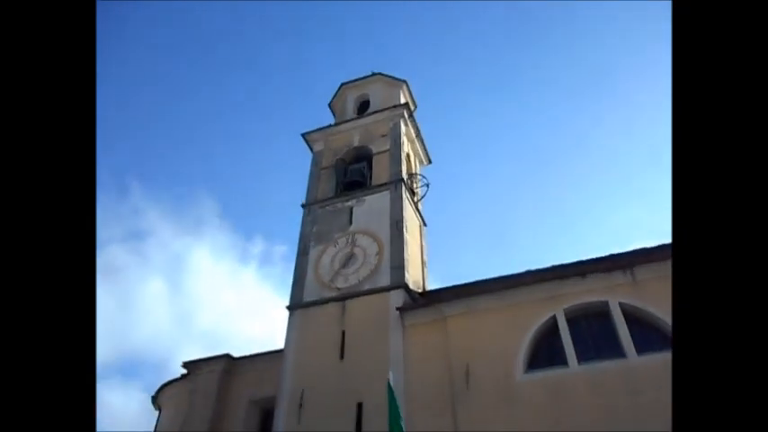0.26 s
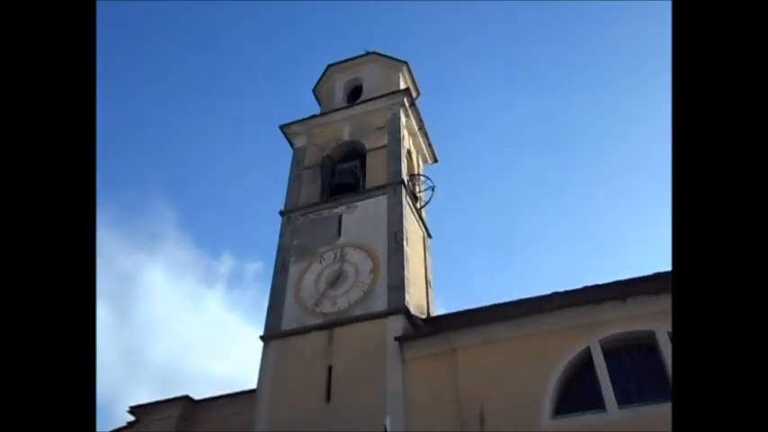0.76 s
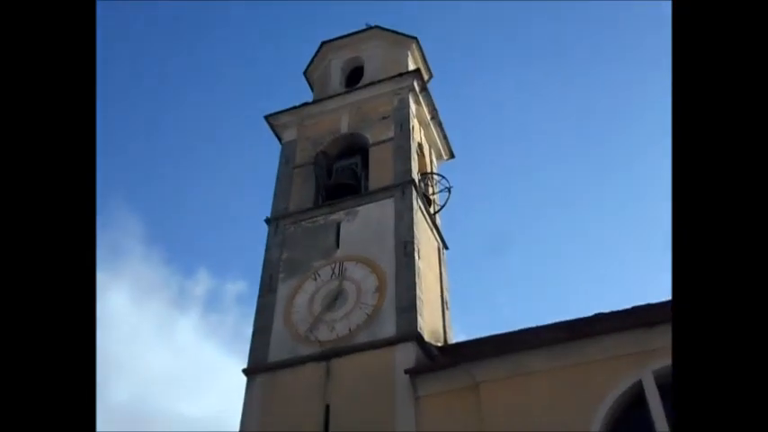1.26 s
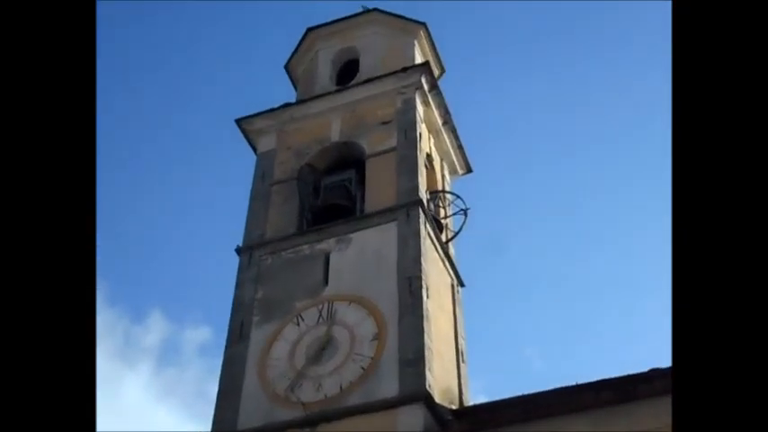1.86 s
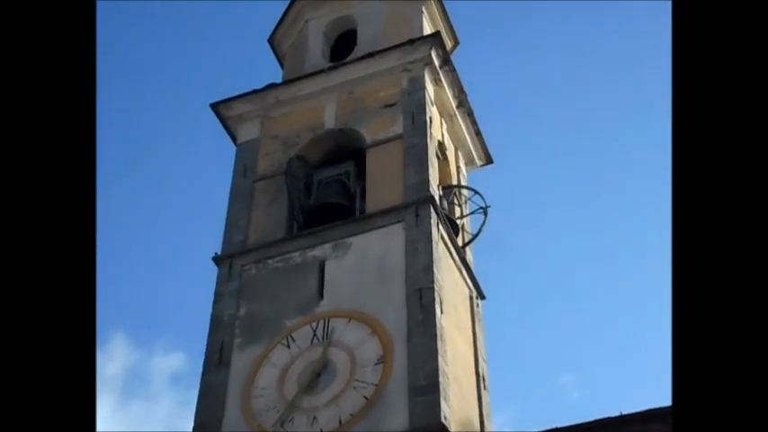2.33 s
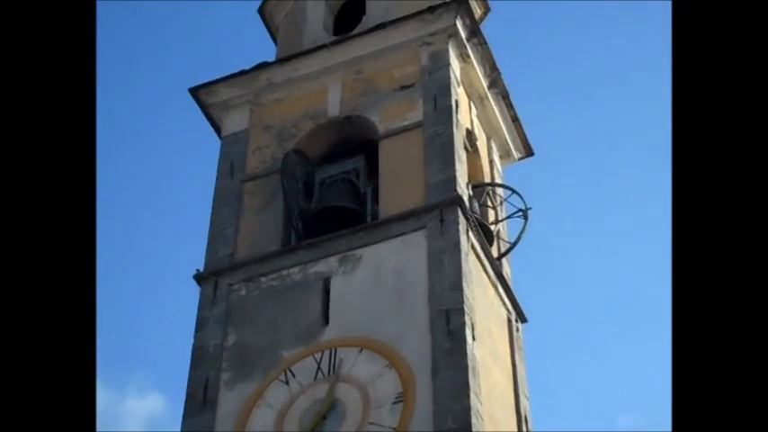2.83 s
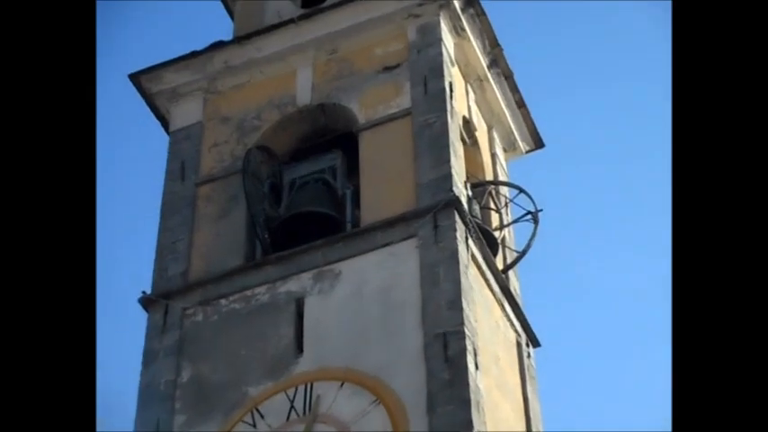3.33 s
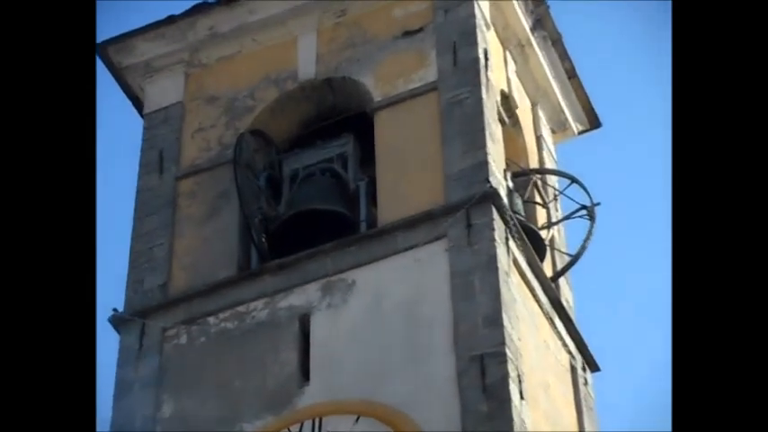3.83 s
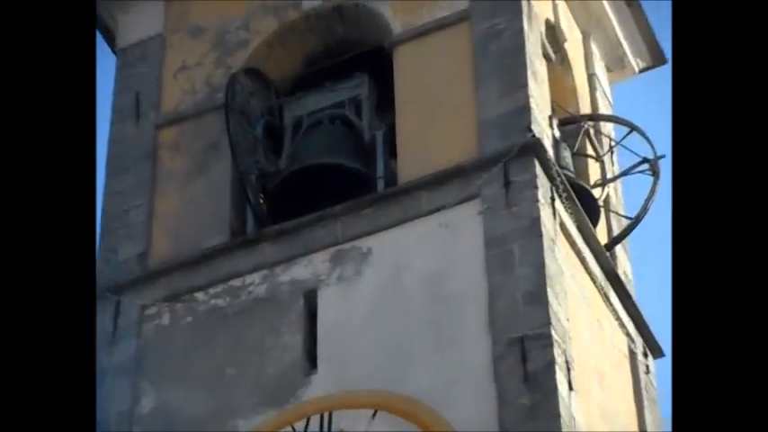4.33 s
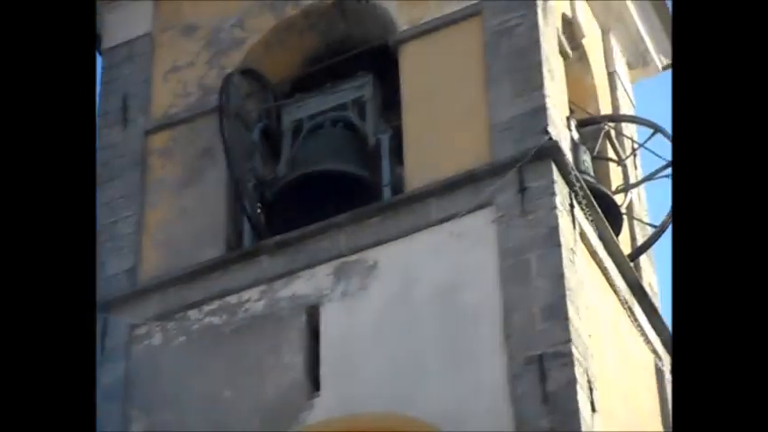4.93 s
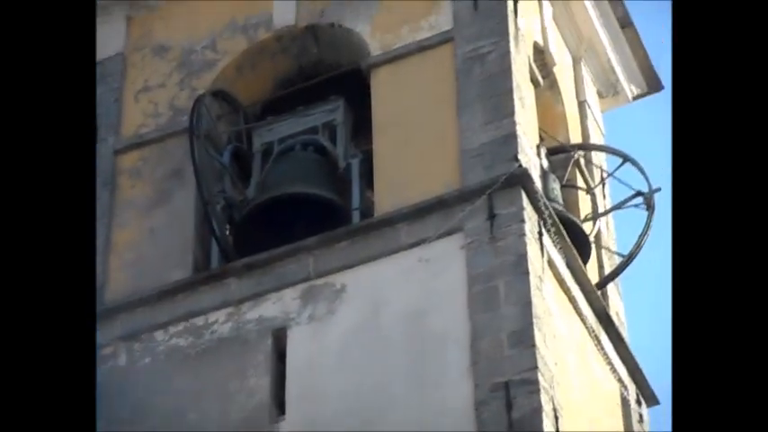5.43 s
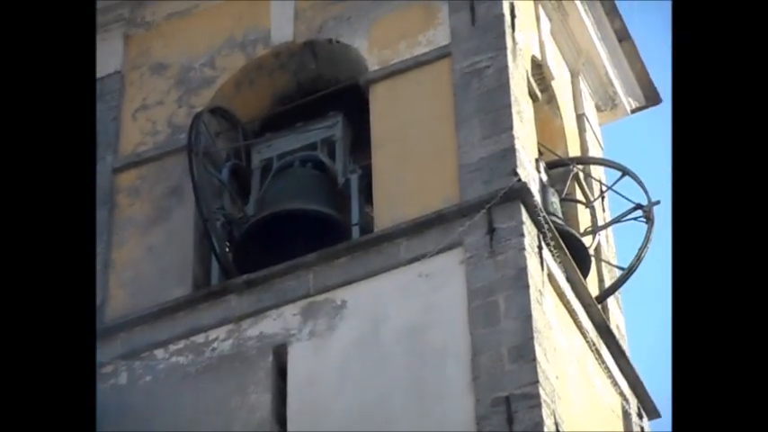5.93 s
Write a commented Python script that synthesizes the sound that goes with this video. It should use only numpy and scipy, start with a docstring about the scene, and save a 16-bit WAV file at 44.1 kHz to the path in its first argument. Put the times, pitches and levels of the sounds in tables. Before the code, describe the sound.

Against the soft air of a quiet town square, a camera's built-in microphone picks up its own zoom: a thin, buzzing gear whir dotted with irregular little ticks from the lens. The whir cuts off, and a single loud snap of the lever follows. Small plastic clicks and brief finger rubs close the scene, all very near and without echo.

```python
"""A small camera's zoom motor rasps in fast steps, heard by the camera's own microphone.
Its gear teeth knock, scrape and clack back through the drive train, while the sliding lens barrel
catches and ticks. The motor stops and the sprung zoom lever snaps home. Fingers click and rub on
the plastic case, and under it all lies the soft outdoor hush of a quiet square."""
import sys
import numpy as np
from scipy import signal
from scipy.fft import rfft, irfft
from scipy.io import wavfile
from scipy.ndimage import uniform_filter1d, minimum_filter1d

SR = 44100
rng = np.random.default_rng(int(sys.argv[2]) if len(sys.argv) > 2 else 0)


def digitize_waveform(pressure):
    """Quantize a signal to 16-bit integers and store it at the path in sys.argv[1].

    Rows of a 2-D input are taken as channels; values are limited to [-1, 1].
    """
    field = np.atleast_2d(pressure).T
    bounded = np.clip(field, -1, 1)
    quanta = np.round(bounded * 32767).astype(np.int16)
    wavfile.write(sys.argv[1], SR, quanta)


N = 272538
TIME = np.arange(N) / SR
RING_SIZE = 2048  # samples in a body's impulse response
FREQS = np.arange(RING_SIZE // 2 + 1) * SR / RING_SIZE


def undb(db):
    """Decibels to gain."""
    return 10 ** (np.asarray(db) / 20)


def unit(x):
    """Scale to rms 1."""
    return x / np.sqrt(np.mean(x ** 2))


def drift(rate_hz):
    """A smooth random wobble with rms 1."""
    hold = int(SR / rate_hz)
    held = np.repeat(rng.standard_normal(N // hold + 4), hold)
    return unit(uniform_filter1d(uniform_filter1d(held, hold), hold)[hold:hold + N])


def bell(centre_hz, width_hz, slope=2):
    """A bump over frequency, 1 at its centre; centred on 0 Hz it is a low shelf."""
    return 1 / (1 + ((FREQS - centre_hz) / width_hz) ** slope)


def delay(ms):
    """Response over frequency of a short delay."""
    return np.exp(-2j * np.pi * FREQS * ms / 1000)


def resonances(modes):
    """Gain over frequency of a body with (Hz, width, dB) modes; it rolls off below the lowest."""
    power = sum(undb(db) ** 2 / (1 + 2 * ((FREQS - hz) / width) ** 2) ** 2 for hz, width, db in modes)
    return np.sqrt(power) * FREQS ** 2 / (FREQS ** 2 + (modes[0][0] / 2) ** 2)


def ring(gain):
    """The minimum-phase impulse response that has this gain over frequency."""
    cepstrum = irfft(np.log(gain + gain.max() * 1e-4))
    cepstrum[1:RING_SIZE // 2] *= 2
    cepstrum[RING_SIZE // 2 + 1:] = 0
    return irfft(np.exp(rfft(cepstrum)))


def through(x, gain):
    """Sound x after passing through a body."""
    return signal.oaconvolve(x, ring(gain))[:len(x)]


def scuff(contact_ms):
    """A brief rough contact, centred in its buffer: random in detail, even in spectrum."""
    ms = (np.arange(RING_SIZE) - RING_SIZE // 2) * 1000 / SR
    pressure = np.exp(-(ms / contact_ms / 2) ** 4)
    force = rng.standard_normal(RING_SIZE) * pressure
    for _ in range(8):  # flatten the spectrum, keep the burst short
        force = pressure * irfft(np.exp(1j * np.angle(rfft(force))))
    return force


def strike(force, body, tail_db, tail_t60):
    """A contact rings a body, and the camera's many small parts add a diffuse tail."""
    hit = signal.fftconvolve(force, ring(body))
    tail = rng.standard_normal(RING_SIZE) * undb(-60 * TIME[:RING_SIZE] / tail_t60)
    tail *= undb(tail_db) / np.linalg.norm(tail)
    tail[0] = 1  # the direct hit
    return signal.fftconvolve(hit, tail)


def place(out, hit, s, db):
    """Land a hit's contact at time s; db is its energy as an rms over one millisecond."""
    start = int(s * SR) - RING_SIZE // 2
    hit = hit * undb(db) * np.sqrt(SR / 1000 / np.sum(hit ** 2))
    out[start:start + len(hit)] += hit[:N - start]


# The tone of the outdoor bed. Each row: frequency in Hz, relative noise density in dB.
HUSH_SPECTRUM = [(18, -57), (30, -24.5), (208, -15), (266, -10), (300, -10), (331, -11.5), (554, -7),
                 (744, -6), (821, -4), (1160, -4), (1280, -4.5), (1370, -8.5), (1710, -8), (5690, -16.5),
                 (10500, -32.5), (13600, -83), (22000, -120)]


def outdoor_hush(level_db=-56.5, swell_db=1.2, flicker_db=0.76):
    """A soft bed of distant town and air; its octaves swell together and flicker alone."""
    hz, db = np.transpose(HUSH_SPECTRUM)
    colour = undb(np.interp(np.log(FREQS + 1), np.log(hz), db))
    hush = 0
    for centre_hz in 62.5 * 2 ** np.arange(9):
        octave = np.cos(np.pi / 2 * np.clip(np.log2((FREQS + 1) / centre_hz), -1, 1))
        hush += through(rng.standard_normal(N), colour * octave) * undb(flicker_db * drift(7.6))
    return unit(hush) * undb(level_db + swell_db * drift(4.384))


# The plastic case's resonances. Each row: pitch in Hz, width in Hz, relative level in dB.
CASE_MODES = [(200, 160, -35), (440, 100, -12), (1012, 210, 4), (1620, 180, 0), (2064, 260, 2.5),
              (2660, 480, 4), (3450, 660, 1), (4230, 490, 2.5), (4970, 550, -3), (6240, 1700, -4),
              (7300, 1900, -10), (8940, 990, -11)]
# Finger strokes. Each row: firmest moment in seconds, level in dB, swell and release in seconds.
FINGER_STROKES = [(5.24, -57.5, 0.014, 0.028), (5.36, -55, 0.042, 0.093), (5.46, -54.5, 0.05, 0.041),
                  (5.69, -61.5, 0.011, 0.022), (6.035, -56, 0.04, 0.024), (6.17, -62, 0.049, .04)]


def finger_rubs(grain_db=2.5, low_cut_hz=1800):
    """Skin drags over the plastic in fine uneven grains; each stroke swells and lets go."""
    power = 0
    for s, db, swell_s, release_s in FINGER_STROKES:
        width_s = np.where(TIME < s, swell_s, release_s)
        power += undb(db) ** 2 * np.exp(-((TIME - s) / width_s) ** 2 / 2)
    drag = rng.standard_normal(N) * undb(grain_db * drift(400))
    body = resonances(CASE_MODES) * FREQS / (FREQS + low_cut_hz)
    return unit(through(drag, body)) * np.sqrt(power)


# Light clicks under the fingers. Each row: start in seconds, level in dB, bass and treble shelves
# in dB, pitch of the touched part in Hz.
FINGER_CLICKS = [(3.083, -28, 2, -34, 2640), (3.9118, -23, -20, 3, 5370), (4.171, -28, -3.5, -45, 2530),
                 (4.3463, -32.5, -26, 4.5, 3250), (4.736, -47, -15, 4, 4300), (4.888, -51, -20, 11, 8500),
                 (4.9565, -39.5, -30, 3, 4040), (4.984, -39, -14, -4.5, 1960), (5.0884, -29, 4, -5, 3600),
                 (5.099, -44, -22, 8, 7500), (5.145, -36.5, -16, 5, 5870), (5.156, -24.5, 10, 7, 7540),
                 (5.378, -43, 2, -5, 1500), (5.403, -34.5, -28, 12, 6900), (5.4667, -39, -15, 2, 2800),
                 (5.663, -40.5, 16, 3, 3240), (5.683, -35, 5.5, 11, 2010), (6.042, -30, 6, -0.5, 3900)]


def case_clicks(bass_hz=1700, treble_hz=4800, part_db=9.5):
    """Small clicks ring the case and the touched part; the spot sets how much bass and treble answer."""
    out = np.zeros(N)
    for s, db, bass_db, treble_db, part_hz in FINGER_CLICKS:
        touch_db = bass_db * bell(0, bass_hz, slope=6) + treble_db * (1 - bell(0, treble_hz, slope=6))
        touch_db += part_db * bell(part_hz, width_hz=300)
        body = resonances(CASE_MODES) * undb(touch_db)
        place(out, strike(scuff(contact_ms=0.56), body, tail_db=-12, tail_t60=0.035), s, db)
    return out


# The lever's one snap: start in seconds, level in dB, contact time in ms.
LEVER_SNAP = (4.8371, -6, 1)
# The lever and its seat. Each row: pitch in Hz, width in Hz, relative level in dB.
LEVER_MODES = [(150, 86, -33), (280, 100, -26.5), (790, 140, -9.5), (1105, 200, -1), (1586, 200, -2.5),
               (2000, 70, -8), (3030, 430, 2.5), (3600, 140, -4.5), (4400, 390, 0), (5540, 370, -5.5),
               (6800, 360, -9.5), (8240, 900, -19), (10000, 510, -20)]
# Faint, thin tones after the snap. Each row: pitch in Hz, starting level in dB, seconds to fade 60 dB.
AFTER_SNAP_TONES = [(884, -35, 0.078), (1415, -46, 0.17), (2320, -34, 0.085), (2510, -34.5, 0.1),
                    (3020, -39, 0.086), (4700, -44, 0.1), (7750, -39, 0.071)]


def zoom_lever():
    """The sprung lever snaps into its seat; faint, thin tones linger briefly after it."""
    out = np.zeros(N)
    s, db, contact_ms = LEVER_SNAP
    snap = strike(scuff(contact_ms), resonances(LEVER_MODES), tail_db=-17, tail_t60=0.021)
    place(out, snap, s, db)
    age, start = TIME[:SR // 4], int(s * SR)
    for hz, tone_db, t60 in AFTER_SNAP_TONES:
        out[start:start + len(age)] += undb(tone_db - 60 * age / t60) * np.sin(2 * np.pi * hz * age)
    return out


# The lens barrel's resonances. Each row: pitch in Hz, width in Hz, relative level in dB.
BARREL_MODES = [(123, 57, -15.5), (543, 170, -5), (742, 270, 0), (1066, 205, 1), (1430, 380, -4.5),
                (2050, 460, 2), (2680, 330, 5), (3160, 1500, 1)]
# The barrel's tone as it slides out. Each row: time in seconds, pitch of its hollow in Hz,
# wall ring in dB, chatter in dB.
BARREL_TRAVEL = [(.55, 1070, -5, -4.5), (.98, 1020, 1, -13), (1.13, 930, 0.5, -13), (1.31, 1090, 1.5, -15),
                 (1.5, 1030, -3.5, -13), (1.85, 1090, -3, -14), (2.65, 940, -8.5, -6), (3.7, 810, -6, -3)]


def barrel_knock(s, contact_hz, bass_db, hollow_db, detune=0.044, colour_db=0.9, bounce_ms=0.892):
    """One knock with a quick bounce and chatter, duller on soft contact; lens travel tunes its hollow."""
    travel_s, *columns = np.transpose(BARREL_TRAVEL)
    hollow_hz, wall_db, chatter_db = (np.interp(s, travel_s, column) for column in columns)
    modes = [(hz * (1 + detune * rng.standard_normal()), width, db + colour_db * rng.standard_normal())
             for hz, width, db in BARREL_MODES]
    modes[3] = (hollow_hz, *modes[3][1:])  # the fourth mode is the hollow
    bounce = undb(-9 + 2 * rng.standard_normal()) * delay(bounce_ms)
    chatter = undb(chatter_db) * rfft(np.fft.ifftshift(scuff(bounce_ms))) * delay(2 * bounce_ms)
    softness = 1 / np.sqrt(1 + (FREQS / contact_hz) ** 8) + undb(-21)  # a faint bright edge stays
    force = np.fft.fftshift(irfft((1 + bounce + chatter) * softness))
    spot_db = bass_db * bell(0, 600, slope=4) + hollow_db * bell(hollow_hz, 350, slope=4)
    spot_db += wall_db * (bell(2200, 260) - bell(1530, 260))  # the wall rings and cancels a band below
    return strike(force, resonances(modes) * undb(spot_db), tail_db=-9.5, tail_t60=0.026)


# The barrel's ticks. Each row: start in seconds, level in dB, contact bandwidth in Hz,
# bass thump in dB, hollow ring in dB.
BARREL_TICKS = [(0.3586, -33.0, 3000, -9, -4), (0.3765, -34.5, 1270, 0, -3), (0.551, -31, 1770, -1, 1),
                (0.582, -42, 1070, -5, 0), (0.61, -42.5, 1070, -1, -3), (0.6595, -30, 2880, -4, -3),
                (0.7, -41, 2110, 6, 3), (0.8237, -32, 2520, 3, 3), (0.9835, -26.5, 3400, 0, -8),
                (1.1288, -25, 2900, 0, 3), (1.2452, -24.5, 3720, 2.5, 2.5), (1.314, -28, 3240, 2, -4),
                (1.403, -27.5, 3330, 2, -0.5), (1.5402, -28, 3180, 4.5, -0.5),
                (1.6356, -27.5, 3520, 4.5, -2.5), (1.74, -27, 3430, 5, 6.5), (1.817, -26.5, 2560, 2, -1.5),
                (1.8621, -27.5, 2680, 5.5, 0.5), (1.8987, -28.5, 2200, 1.5, -3.5),
                (1.9494, -35.5, 2150, 10, -3.5), (2.0296, -30.5, 2150, 5, -5.5), (2.08, -32, 2290, 5, -7),
                (2.1442, -35.5, 1960, 3, -9), (2.193, -35, 1910, 8, -4), (2.4419, -28.5, 2660, 4, -3.5),
                (2.5885, -29, 2180, 0.5, -1), (2.6905, -29, 2500, 5, 3), (2.781, -29.5, 1570, -0.5, 0),
                (2.8548, -28.5, 2830, 6, 1.5), (2.9047, -33, 1530, 3, -4), (2.92, -33.5, 1390, -10, 3),
                (2.9437, -37, 1500, 4, -7), (2.9572, -36, 1060, -1, 1), (3.467, -42, 1100, 3, -9),
                (3.64, -35.5, 1600, 6.5, -2.5), (3.7694, -37.5, 1350, 5, -1), (3.789, -39.5, 1300, 2, -2),
                (3.8343, -38.5, 1980, 5, -3), (3.8886, -40.5, 1120, 11.5, -2), (4.037, -46, 480, 3, -1),
                (4.3657, -37, 1970, 1, -1), (4.561, -29, 1900, -4, 6), (4.58, -34.5, 1760, -1, -5)]
# How loosely the barrel sits in its guide. Each row: time in seconds, rebound in dB against its tick.
BARREL_REBOUND = [(.36, -12), (.55, -4.5), (.68, -3.5), (1.1, -16), (1.75, -19), (2.1, -24), (2.65, -8.5),
                  (2.9, -17), (2.96, -5), (3.5, -29), (3.8, -11), (4.04, -10), (4.56, -28)]


def barrel_ticks(rebound_gap_s=0.0145, spread_s=0.00149, rebound_contact_hz=1250):
    """The sliding barrel catches and lets go, falling back softly after each tick."""
    out = np.zeros(N)
    for s, db, contact_hz, bass_db, hollow_db in BARREL_TICKS:
        place(out, barrel_knock(s, contact_hz, bass_db, hollow_db), s, db)
        rebound_s = s + rebound_gap_s + spread_s * rng.standard_normal()
        rebound_db = db + np.interp(s, *np.transpose(BARREL_REBOUND))
        place(out, barrel_knock(s, rebound_contact_hz, bass_db, hollow_db), rebound_s, rebound_db)
    return out


def step_pulses(steps, step_hz, late_ms, db, jitter_ms=0.022, scatter_db=1.15):
    """One sharp pulse per motor step; lateness and strength follow a pattern that repeats every turn."""
    step = np.arange(1, int(steps[-1]) - 2)
    jitter, scatter = rng.standard_normal((len(step), 2)).T
    at_s = np.interp(step, steps, TIME) + (np.resize(late_ms, len(step)) + jitter_ms * jitter) / 1000
    strength = undb(np.resize(db, len(step)) + scatter_db * scatter)
    taps = (at_s * SR).astype(int)[:, None] + np.arange(-3, 5)
    pulses = strength[:, None] * np.sinc(taps - at_s[:, None] * SR)  # lands between samples
    out = np.zeros(N)
    np.add.at(out, np.clip(taps, 0, N - 1), pulses)
    return out * np.sqrt(SR / step_hz)


# The uneven steps of one motor turn. Each row: knock delay in ms, knock strength in dB,
# backlash delay in ms, backlash strength in dB.
TURN_STEPS = [(0.089, -3, 2.1, -10), (0.14, -3.5, 2.3, -5.5), (0.243, -0.5, 2.2, -3), (0.15, -1, 2.9, -8.5),
              (0.444, -2, 2.2, -8.5), (0.35, -5, 3.1, -11)]


def gear_teeth(steps, step_hz, scrape_ms=0.92, grit_db=0.5):
    """Teeth knock, clack back and scrape at each step: two forces and the scrape's envelope."""
    knock_ms, knock_db, backlash_ms, backlash_db = np.transpose(TURN_STEPS)
    knock = step_pulses(steps, step_hz, knock_ms, knock_db)
    backlash = step_pulses(steps, step_hz, backlash_ms, backlash_db)
    scrape = np.sqrt(signal.lfilter([1], [1, -np.exp(-2000 / SR / scrape_ms)], knock ** 2))
    scrape = uniform_filter1d(scrape, int(2 * scrape_ms * SR / 1000))
    scrape = unit(scrape * undb(grit_db * rng.standard_normal(N)))
    contact = scuff(contact_ms=0.39)
    contact /= np.linalg.norm(contact)
    knock, backlash = (signal.oaconvolve(x, contact, mode="same") for x in (knock, backlash))
    return knock, backlash, scrape


# Moments along the lens travel, in seconds.
ZOOM_MOMENTS_S = [0.2, 0.55, 0.9, 1.7, 2.7, 3.4, 4.3]
# The drive train's resonances. Each row: pitch in Hz, width in Hz, then relative level in dB
# at each of those moments.
DRIVE_MODES = [(1822, 235, -0.5, -1.5, -1.5, 0.5, 0.5, 0, 0), (2243, 176, 3, 2, 1, 0.5, 1, 0.5, 1.5),
               (2564, 490, -1, -2.5, 0, 2, 2, 2.5, 0.5), (3246, 710, 0.5, -3.5, -0.5, -1, -1, 1, -1),
               (3894, 740, -1, -2, -3.5, -3.5, -2, -3.5, -2.5), (4750, 480, -6, -3, -0.5, -1, 0, -3, 0.5),
               (6230, 940, -2, -1.5, -0.5, -1, -1, -1, -1),
               (7280, 930, -17, -12, -14.5, -10.5, -7.5, -5.5, -5),
               (8404, 955, 0, 1, -0.5, -2, -2.5, -3, -5), (9610, 1340, -24, -24, -26, -22, -20, -20, -21)]
# The rasp's texture, against the knock. Each row: frequency in Hz, then in dB the gear noise,
# its lift at the tight spot, scrape, backlash and the limp of every second step.
RASP_MIX = [(2180, 3, 5, -11, -0.5, -1), (3560, -5, 6, -3.5, -3.5, 2.5), (4750, -10.5, -1, -12.5, -17, -12),
            (6260, 0, 2.5, -5, -6, 0), (8500, -5.5, 3.5, -3.5, -10.5, -2)]


def zoom_motor(step_hz=210.3, wander=0.007, level_db=-48.5, sag_db_per_s=-0.24, stop_s=4.608):
    """The stepping motor shakes the drive train; its gears bind and grind once in every turn."""
    steps = np.cumsum(step_hz * (1 + wander * drift(25))) / SR
    knock, backlash, scrape = gear_teeth(steps, step_hz)
    turns = (steps - 1) / len(TURN_STEPS)
    tight_spot = np.exp(2.2 * (np.cos(2 * np.pi * (turns - 0.62)) - 1))  # peaks 62% into each turn
    limping = np.round(steps - 1) % 2 * np.clip(TIME / 0.75, 0, 1) ** 2  # sets in over 0.75 s
    mix_hz, *columns = np.transpose(RASP_MIX)
    rasp = 0
    for k, (hz, width, *zoom_db) in enumerate(DRIVE_MODES):
        gear_db, tight_db, scrape_db, backlash_db, limp_db = (np.interp(hz, mix_hz, c) for c in columns)
        limp = undb(limp_db * limping)
        grind = undb(gear_db + tight_db * tight_spot)
        friction = np.hypot(undb(scrape_db) * scrape * limp, grind) * rng.standard_normal(N)
        force = unit(knock * limp + undb(backlash_db) * backlash + friction)
        band = 1 / np.sqrt(1 + np.abs(2 * (FREQS - hz) / width) ** 3.97)
        travel_gain = np.interp(TIME, ZOOM_MOMENTS_S, undb(zoom_db))
        rasp += (-1) ** k * travel_gain * through(force, band)  # neighbouring modes flip polarity
    running = np.clip((stop_s - TIME) / 0.0013, 0, 1)
    return unit(rasp) * undb(level_db + sag_db_per_s * TIME) * running


def scene():
    """The mono mix; the camera's sounds reach the microphone through its body, so they are dry."""
    camera = zoom_motor() + barrel_ticks() + zoom_lever() + case_clicks() + finger_rubs()
    return (camera + outdoor_hush())[None]


def record(dry):
    """A limiter holds the snap's peak under the ceiling, and a steep low-pass trims the top."""
    ceiling, limiter_s, cutoff_hz = 0.97, 0.003, 10420
    window = int(limiter_s * SR)
    gain = ceiling / np.maximum(np.abs(dry), ceiling)
    gain = uniform_filter1d(minimum_filter1d(gain, 2 * window), window)
    low_pass = signal.firwin(221, cutoff_hz, window=("kaiser", 10), fs=SR)
    return signal.oaconvolve(dry * gain, low_pass[None], mode="same")


dry = scene()
out = record(dry)
digitize_waveform(out)
```